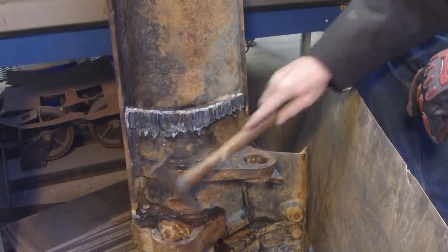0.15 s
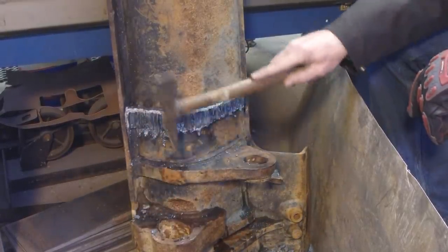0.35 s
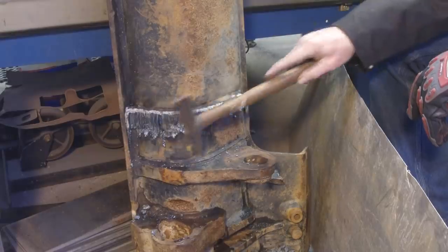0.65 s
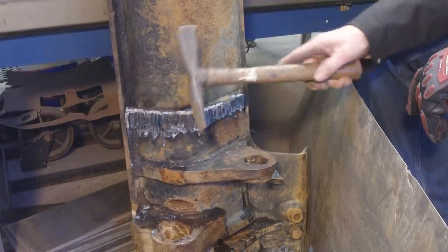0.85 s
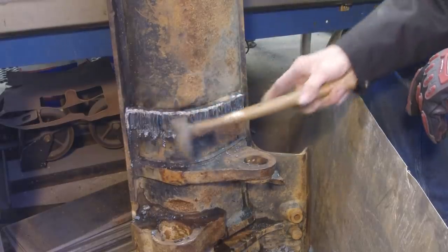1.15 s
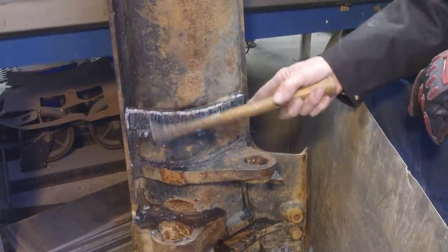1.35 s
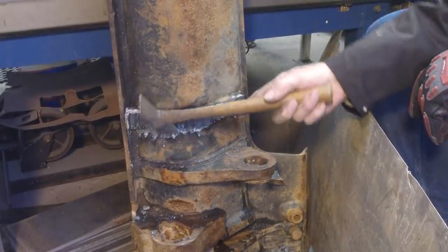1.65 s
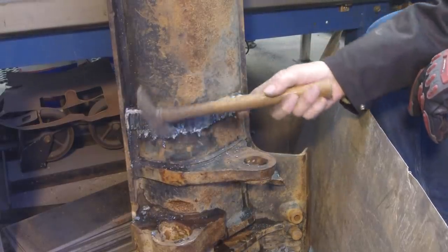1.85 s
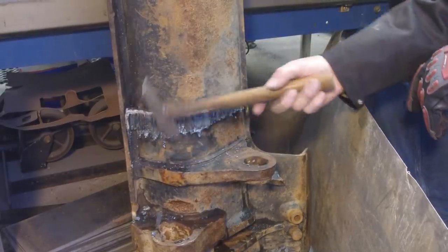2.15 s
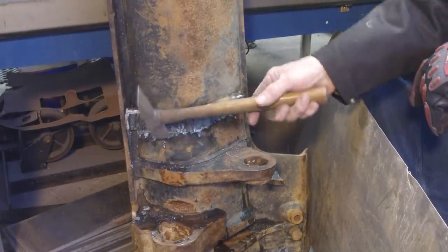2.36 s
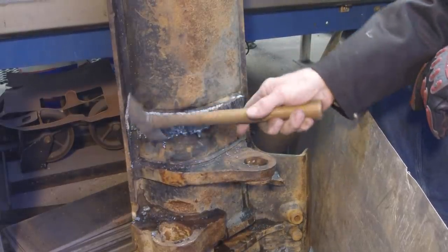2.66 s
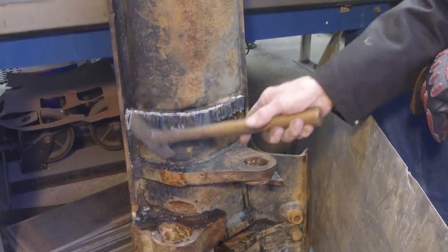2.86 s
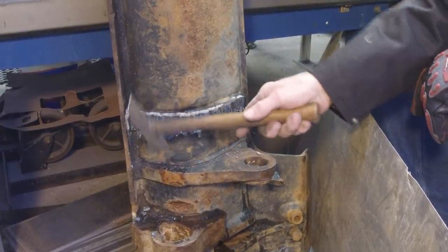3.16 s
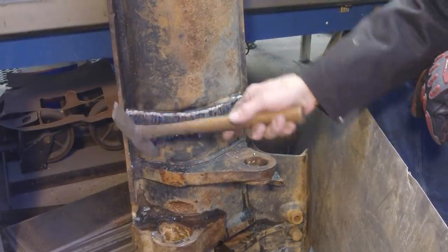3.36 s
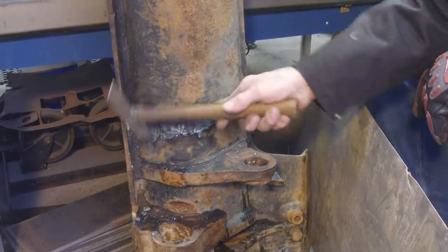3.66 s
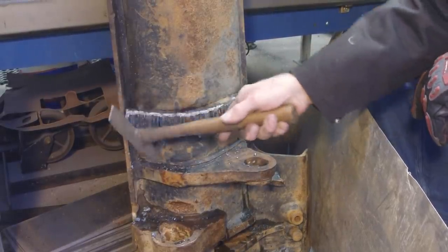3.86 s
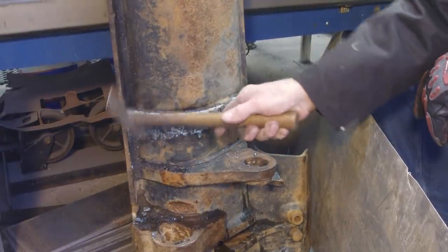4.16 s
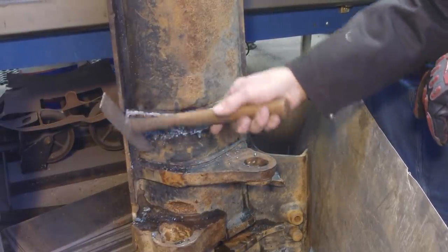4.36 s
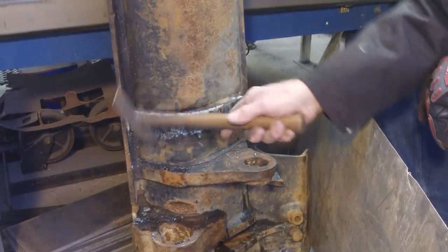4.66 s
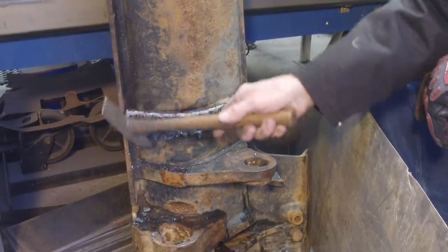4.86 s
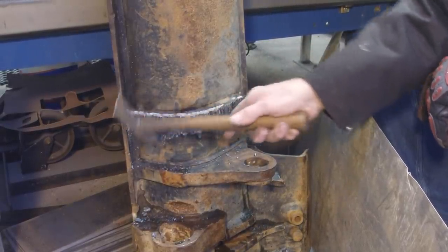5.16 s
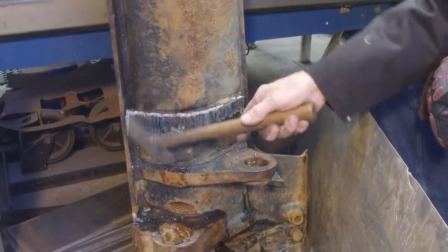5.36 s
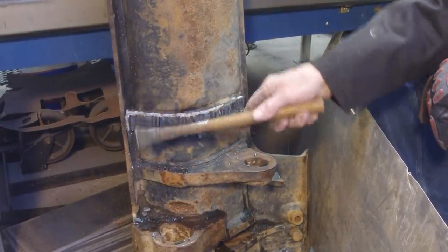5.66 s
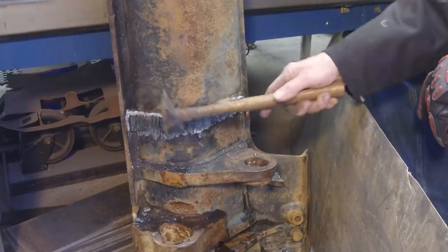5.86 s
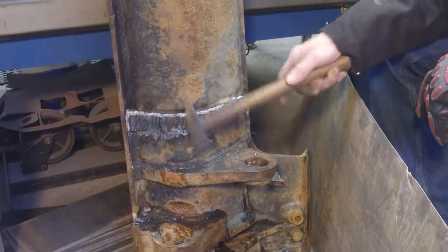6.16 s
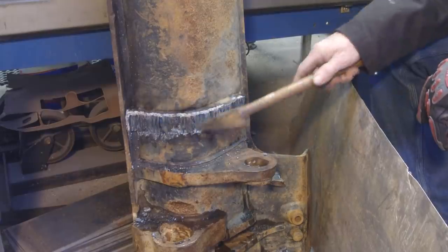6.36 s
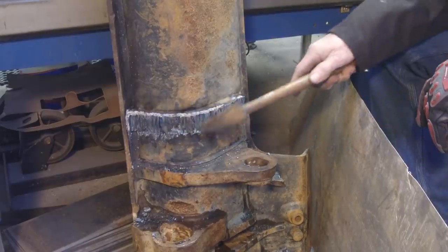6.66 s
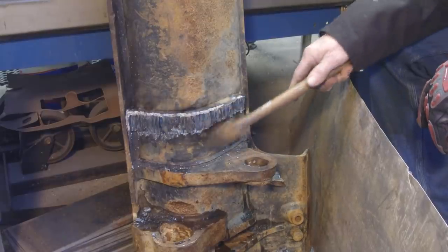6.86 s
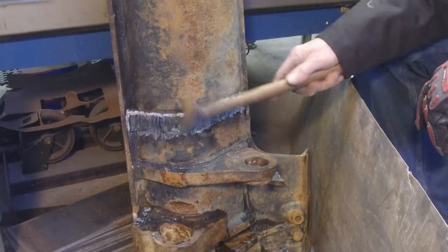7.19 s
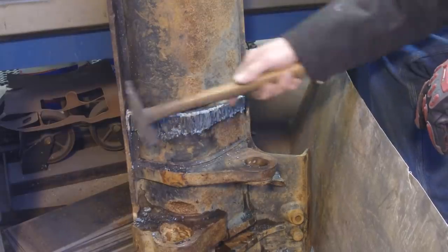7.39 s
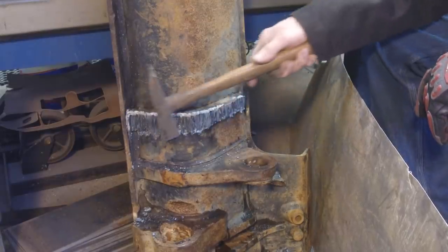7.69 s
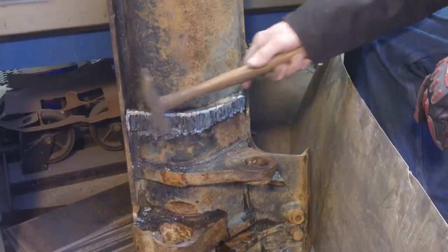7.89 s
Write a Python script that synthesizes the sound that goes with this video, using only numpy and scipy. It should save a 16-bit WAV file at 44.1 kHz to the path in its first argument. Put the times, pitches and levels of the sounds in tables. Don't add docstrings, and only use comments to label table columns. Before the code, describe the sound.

Close up in a machine shop, two clangs on a steel flange come first, then a hammer chips steadily at a weld on a thick pipe, about four knocks a second. Each hit is sharp with a short metallic ring, some with a quick rebound. Brittle slag ticks and sprays. Three harder blows follow, then the edge rasps along the bead. Distant motors hum faintly; the room adds short reverberation.

```python
import sys
import numpy as np
from scipy import signal
from scipy.io import wavfile
from scipy.ndimage import uniform_filter1d

SR = 44100
rng = np.random.default_rng(int(sys.argv[2]) if len(sys.argv) > 2 else 0)


def waveform_to_disk(signal):
    frames = np.transpose(np.atleast_2d(signal))
    scaled = np.clip(frames, -1, 1) * 32767
    samples = np.round(scaled).astype(np.int16)
    wavfile.write(sys.argv[1], SR, samples)


def invert_db(x):
    u = np.asarray(x, float) / 20
    return 10 ** u


N = 354123

BAND_EDGES_HZ = 22 * 2 ** np.arange(0, 9.7, 1 / 3)

# (frequency [Hz], level [dB])
HUM_COLOUR = [(12, -62), (20, -27), (48, -45), (65, -15.5), (124, 0), (147, -17), (169, -12), (184, -11),
              (212, -11.5), (258, -18.5), (750, -18), (1280, -29), (6530, -43.5), (13600, -42),
              (16500, -80)]
HUM_DB = -44.5
# (frequency [Hz], width of the waver [Hz], level [dB])
DRONES = [(81.6, 2.1, -4.5), (98.6, 17, -4), (118.73, 2.35, -3), (208, 3.4, -7.5), (363, 10, -11.5),
          (708, 23, -14)]
# (time [s], level [dB])
MOTOR_LOAD = [(0.0, -37), (0.09, -66), (0.15, -31.5), (0.51, -49), (0.65, -42), (1.34, -49), (1.36, -36.5),
              (1.65, -39), (1.74, -46), (1.97, -40.5), (6.17, -40), (6.22, -47), (6.93, -40), (8.03, -47)]

# (time [s], strength [dB], brightness [dB], head ring [dB], edge sharpness [dB])
BLOWS = [(1.361, -8.5, -5.5, -18, -28.5), (1.601, -14, 0.5, -20.5, -32), (1.85, -20, -6.5, -32.5, -33),
         (2.124, -14, -8.5, -29, -37), (2.378, -24.5, 6, -19, -40), (2.673, -18.5, -9, -37, -27),
         (2.933, -15, -1.5, -25, -27), (3.193, -15.5, -6.5, -43, -38), (3.426, -18.5, -2.5, -31.5, -35.5),
         (3.687, -19.5, 3, -31.5, -28), (3.92, -18, 2, -31, -31), (4.149, -19, -7, -26.5, -37),
         (4.415, -14, -4.5, -35, -34), (4.653, -15, -1.5, -28.5, -34.5), (4.901, -18, -2, -30, -47),
         (5.182, -13.5, -0.5, -37, -37), (5.457, -15.5, -11, -36, -46.5), (5.73, -14.5, -16, -30.5, -30.5),
         (6.031, -22, -6, -19, -28), (6.327, -19.5, 0, -26, -24.5), (6.653, -5.5, -10, -32, -48),
         (6.917, -5.5, -4, -17, -34), (7.172, -10, -3.5, -20, -31.5)]
# (time [s], strength [dB], brightness [dB], head
# ring [dB], edge sharpness [dB])
REBOUNDS = [(0.134, -31.5, -14, -42, -40.5), (0.251, -14.5, -7.5, -37, -45), (0.672, -7, -16, -35, -26),
            (0.812, -40.5, 6.5, -42.5, -58), (1.418, -23, 5.5, -34, -33), (1.435, -35, -8, -28, -40),
            (1.942, -42, -20, -49, -43.5), (2.159, -37, -6, -24, -26.5), (2.446, -17.5, -37, -39, -50),
            (2.967, -11.5, -12.5, -41, -37), (3.222, -20, 3, -32, -33), (3.468, -10.5, -14, -32, -35),
            (3.718, -9, -14.5, -28, -29), (3.99, -20, -5.5, -30.5, -42), (4.922, -15.5, -17, -53, -28),
            (5.218, -23, 1, -29, -37), (5.259, -26.5, -12, -36, -52), (5.48, -19.5, 0, -41, -35),
            (5.534, -13.5, -19, -43, -48), (6.021, -25, -7, -55, -40), (6.939, -25, -34, -44, -34),
            (7.236, -28.5, 6, -50, -39)]
# (time [s], strength [dB], brightness [dB], head ring [dB], edge sharpness [dB])
CATCHES = [(7.395, -29, -18, -36, -40), (7.416, -23, -13.5, -33.5, -39.5), (7.46, -23, -12, -31, -42),
           (7.544, -28.5, -19, -41, -31.5), (7.666, -24.5, -2, -43, -50), (7.707, -24.5, -15, -37, -28),
           (7.762, -17, -6.5, -41.5, -45), (7.859, -24.5, -6.5, -38.5, -42),
           (7.895, -20, -17.5, -39, -35.5), (7.955, -26, -11, -35, -35)]
CONTACTS = np.array(BLOWS + REBOUNDS + CATCHES)
# (frequency [Hz], level [dB], share of brightness [0-1], share taken from sharpness [0-1])
CONTACT_COLOUR = [(342, -14.5, 0.22, 0.1), (756, -7, 0.01, 0.07), (1040, -9, 0.29, 0.13),
                  (1480, -4, 0.67, 0), (2100, -5.5, 1, 0), (3890, -1, .6, 0.35), (10200, -9.5, 0, 1)]
# (time [s], place [0-1])
PLACE = [(0, 0.27), (3.3, 0.37), (3.7, 0.47), (4.65, 0.71), (5.3, 0.46), (5.46, 0.5), (6.3, 0), (6.9, 0.02),
         (8.03, 0.02)]
# (frequency [Hz], level [dB])
STIFF_END = [(700, -1), (1120, 0), (1600, -4), (2050, 6.5), (2500, 0), (3800, 4.5)]

CRACK_DB, CRACK_T60_S, CRACK_TOP_HZ = -12.5, 0.0093, 2480

PIPE_HZ = [292, 362, 554, 580, 660, 722, 786, 971, 1071, 1122, 1205, 1268, 1497, 1577, 1656, 1740, 1798,
           1928, 1990, 2090, 2190, 2395, 2620, 2720, 2835, 3090]
# (level [dB], t60 [s])
PIPE_RING = [(0.5, 0.089), (-10.5, 0.4), (-11, 0.22), (-11, 0.22), (-5, 0.17), (-14, 0.36), (-16, 0.3),
             (-10.5, 0.17), (-2, 0.08), (-2, 0.22), (-2.5, 0.067), (-15, 0.25), (-15, 0.24), (-13, 0.22),
             (-12, 0.2), (-13.5, 0.3), (-8.5, 0.26), (-12, 0.28), (9, 0.012), (1, 0.05), (-12.5, 0.094),
             (-9, 0.13), (-18.5, 0.14), (-23.5, 0.17), (-23, 0.13), (-16, 0.12)]
TWIN_SPLIT, TWIN_DB = 0.012, -8
# (frequency [Hz], level [dB])
CLANG_COLOUR = [(150, 1), (400, 12), (1100, -1.5), (2400, -3.5), (3300, -13.5), (5800, -3), (6900, -23.5),
                (8800, 14.5), (10000, -45), (12000, -4.5), (15000, -17)]
# (frequency [Hz], t60 [s])
CLANG_T60 = [(60, 0.2), (400, 0.12), (1100, 0.2), (3000, 0.24), (8000, 0.13), (15000, 0.14)]
# (frequency [Hz], level [dB])
RUB_COLOUR = [(1000, -29), (4000, 1), (12000, -55)]

HEAD_HZ = [3880, 4450, 4533, 4620, 5900, 7735, 8812, 9260, 13470, 14900]
# (level [dB], t60 [s], group of jolts [1-5])
HEAD_RING = [(-5, 0.046, 2), (-29, 0.32, 1), (-5, 0.093, 1), (-33, 0.31, 1), (-8, 0.013, 2), (-6, 0.088, 3),
             (3, 0.033, 4), (-9.5, 0.096, 4), (3.5, 0.015, 5), (8, 0.016, 5)]
RING_DB, UPPER_RING_DB, TOP_RING_DB = 6, 1.4, -10
CONTACT_SCATTER_DB = 3.0
# (frequency [Hz], share [0-1])
HEAD_CRUNCH = [(4500, 0.12), (8000, 0.095)]
# (frequency [Hz], level [dB])
HEAD_DRAG = [(4500, -28), (8000, -26), (13000, -33)]
DRAG_IN_HEAD_DB = -8.5

# (frequency [Hz], t60 [s])
SHOP_T60 = [(100, 0.75), (400, 0.54), (1500, 0.25), (5000, 0.37), (14000, 0.24)]

# (time [s], level [dB])
FLANGE_BLOWS = [
    (0.2495, -17.5),
    (0.6725, -9.5),
]
# (frequency [Hz], level [dB], t60 [s])
FLANGE_MODES = [(361, -17, 0.77), (773, -16, 0.38), (957, -5.5, 0.26), (1090, -37, 0.18), (1102, 2, 0.13),
                (2622, -9, 0.05), (4050, -13, 0.027)]

# (time [s], peak level [dB], t60 [s])
CHIP_SHOWERS = [(1.4844, -48, 0.93), (2.5002, -50, 0.2), (3.470, -40, 0.24), (3.715, -26, 0.072),
                (3.96, -23, 0.11), (4.233, -34, 0.11), (4.431, -24, 0.14), (4.683, -25, 0.17),
                (4.932, -28, 0.081), (6.3959, -46.5, 0.93), (6.7272, -20.5, 0.54), (7.213, -25, 0.071)]
# (time [s], peak level [dB])
CHIP_TICKS = [(1.485, -29), (2.503, -25.5), (4.272, -43), (5.108, -31.5), (5.844, -27), (5.9308, -40),
              (6.3976, -16), (6.7274, -28), (7.1152, -39), (7.3627, -43), (7.488, -29)]
# (frequency [Hz], level per band [dB])
GRIT_COLOUR = [(1470, -13), (2500, 7), (3080, -6), (3720, 7), (13500, 8), (15300, 1), (16000, -24)]

# (time [s], level [dB])
DRAG_PRESSURE = [(7.39, -64), (7.436, -29.5), (7.64, -41.5), (7.67, -34), (7.76, -31), (7.852, -48),
                 (7.87, -46), (7.97, -36.5), (8.03, -43)]

TOP_HZ = 15300


def rms_one(x):
    return x / np.sqrt(np.mean(x ** 2) + 1e-20)


def at_hz(points, hz):
    table = np.array(points)
    return np.interp(np.log(hz), np.log(table[:, 0]), table[:, 1])


def curves(rows):
    s, *columns = np.transpose(rows)
    t = np.arange(N) / SR
    return [invert_db(np.interp(t, s, column, left=-200)) for column in columns]


def clicks(times, sizes):
    out = np.full(N, 1e-18)
    np.add.at(out, np.round(np.asarray(times) * SR).astype(int), sizes)
    return out


def ring(x, hz, t60):
    r = invert_db(-60 / (t60 * SR))
    w = 2 * np.pi * hz / SR
    return signal.lfilter([0, np.sin(w)], [1, -2 * r * np.cos(w), r * r], x)


def die(x, t60):
    return signal.lfilter([1], [1, -invert_db(-60 / (t60 * SR))], x)


def bands(length):
    white = rng.standard_normal((2, length))
    for k, (low, high) in enumerate(zip(BAND_EDGES_HZ, BAND_EDGES_HZ[1:])):
        band = signal.butter(2, [low, high], "band", fs=SR, output="sos")
        yield np.sqrt(low * high), signal.sosfilt(band, white[k % 2])


def blow_db(hz):
    s, strength_db, bright_db, ring_db, sharp_db = CONTACTS.T
    corner_hz, *rule = np.transpose(CONTACT_COLOUR)
    colour_db, bright, sharp = [np.interp(np.log(hz), np.log(corner_hz), column) for column in rule]
    place = np.interp(s, *np.transpose(PLACE))
    place_db = (2 * place - 1) * at_hz(STIFF_END, hz)
    return colour_db + place_db + (1 - sharp) * strength_db + bright * bright_db + sharp * sharp_db


def crushed(hits, crunch, share, t60):
    return hits + share * crunch * die(hits, t60)


def machinery(bank):
    hum = sum(invert_db(at_hz(HUM_COLOUR, hz)) * noise[::-1] for hz, noise in bank)
    out = invert_db(HUM_DB + 0.5) * rms_one(hum)
    load, = curves(MOTOR_LOAD)
    for hz, width_hz, level_db in DRONES:
        t60 = np.log(1000) / np.pi / width_hz
        drone = rms_one(ring(rng.standard_normal(N), hz, t60))
        out += invert_db(level_db) * load * drone
    return out


def crack(crunch):
    hits = clicks(CONTACTS[:, 0], invert_db(blow_db(1600) + CRACK_DB))
    band = signal.butter(1, [300, CRACK_TOP_HZ], "band", fs=SR, output="sos")
    return signal.sosfilt(band, 3 * crunch * die(hits, CRACK_T60_S))


def pipe_modes(drag, crunch):
    times, out = CONTACTS[:, 0], np.zeros(N)
    spread_db = np.clip(3 * rng.normal(0, 1, (len(times), len(PIPE_RING))), -9, 3)
    for k, (hz, (level_db, t60)) in enumerate(zip(PIPE_HZ, PIPE_RING)):
        hits = clicks(times, invert_db(blow_db(hz) + 1.0 + spread_db[:, k]))
        force = crushed(hits, crunch, 0.03, 0.16) + invert_db(-38.5) * drag
        sign = (-1) ** k
        twin = invert_db(TWIN_DB) * ring(force, hz + sign * TWIN_SPLIT * hz, t60 * 0.7)
        out += sign * invert_db(level_db) * (ring(force, hz, t60) + twin)
    return out


def pipe_clang(drag, bank):
    out = np.zeros(N)
    rub = uniform_filter1d(np.abs(drag), size=200)
    for hz, noise in bank[6:]:
        hits = clicks(CONTACTS[:, 0], invert_db(blow_db(hz)))
        knock = invert_db(8) * die(hits, 0.0073)
        body = die(hits, at_hz(CLANG_T60, hz)) + knock
        fall = die(body, 0.0018) * 0.047
        rubbed = invert_db(at_hz(RUB_COLOUR, hz)) * rub
        out += invert_db(at_hz(CLANG_COLOUR, hz) + 12) * noise * (fall + rubbed)
    return out


def pipe(drag, crunch, bank):
    drag = signal.sosfilt(signal.butter(2, 900, "high", fs=SR, output="sos"), drag)
    return pipe_modes(drag, crunch) + pipe_clang(drag, bank)


def jolts():
    s, strength_db, bright_db, ring_db, sharp_db = CONTACTS.T
    scatter_db = CONTACT_SCATTER_DB * rng.normal(0, 1, (2, len(s)))
    upper_db = sharp_db + UPPER_RING_DB + scatter_db[0]
    top_db = sharp_db + TOP_RING_DB + scatter_db[1]
    return [s, ring_db + RING_DB, blow_db(5000), upper_db, top_db, blow_db(14000)]


def head(drag, crunch):
    out = np.zeros(N)
    times, *groups_db = jolts()
    for hz, (level_db, t60, group) in zip(HEAD_HZ, HEAD_RING):
        hits = clicks(times, invert_db(groups_db[round(group) - 1]))
        force = crushed(hits, crunch, at_hz(HEAD_CRUNCH, hz), 0.074)
        force = force + invert_db(at_hz(HEAD_DRAG, hz)) * drag
        out += invert_db(level_db) * ring(force, hz, t60)
    return out


def thump():
    hits = clicks(CONTACTS[:, 0], invert_db(0.5 * blow_db(950) - 15.5))
    push = signal.lfilter([0.01], [1, -0.99], hits)
    return ring(push, 24.8, 0.22)


def shop(x):
    t = np.arange(SR) / SR
    tail = sum(noise * invert_db(-60 * t / at_hz(SHOP_T60, hz)) for hz, noise in bands(SR))
    tail = tail * np.clip((t - 0.004) / 0.0014, 0, 1)
    return signal.fftconvolve(x, tail / np.sqrt(np.sum(tail ** 2)))[:N]


def flange():
    s, level_db = np.transpose(FLANGE_BLOWS)
    hits = clicks(s, -invert_db(level_db))
    return sum(invert_db(mode_db) * ring(hits, hz, t60) for hz, mode_db, t60 in FLANGE_MODES)


def slag(bank):
    showers = sum(die(clicks([s], invert_db(peak_db - 9.5)), np.clip(t60, 0.01, 1))
                  for s, peak_db, t60 in CHIP_SHOWERS)
    tick_s, tick_db = np.transpose(CHIP_TICKS)
    ticks = die(clicks(tick_s, invert_db(tick_db - 11)), 0.015)
    grit = rms_one(sum(invert_db(at_hz(GRIT_COLOUR, hz)) * noise for hz, noise in bank if hz > 1500))
    return grit * (showers + ticks)


def dragging():
    sizes = invert_db(3 * np.minimum(rng.exponential(1, N), 4)) * rng.choice([-1, 1], N)
    clump_starts = (rng.random(N) < 250 / SR) * rng.random(N) ** 2
    clumps = die(clump_starts, 0.02) + 0.1
    impacts = rng.random(N) < 6000 / SR
    return rms_one(clumps * sizes * impacts)


def scene():
    bank = list(bands(N))
    crunch = rng.standard_normal(N)
    pressure, = curves(DRAG_PRESSURE)
    drag = dragging() * pressure
    hammer = head(drag * invert_db(DRAG_IN_HEAD_DB), crunch)
    work = pipe(drag, crunch, bank) + crack(crunch) + flange() + slag(bank)
    room = invert_db(-6.5) * shop(work + 0.5 * hammer)
    mix = work + invert_db(0.5) * hammer + room + thump() + machinery(bank)
    return mix[None]


def top_cut(x):
    return signal.sosfilt(signal.butter(12, 16650, fs=SR, output="sos"), x)


def record(dry):
    squeezed = 0.69 * np.tanh(dry / 0.75)
    low_pass = signal.cheby2(12, 30, TOP_HZ * 1.03, fs=SR, output="sos")
    return top_cut(signal.sosfilt(low_pass, squeezed))


dry = scene()
out = record(dry)
waveform_to_disk(out)
```